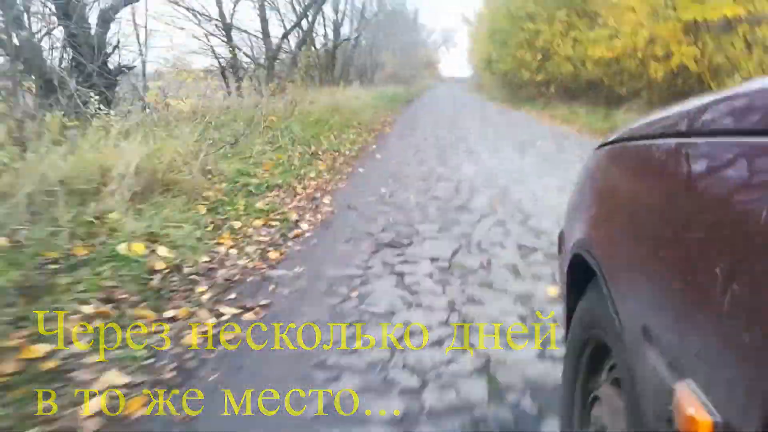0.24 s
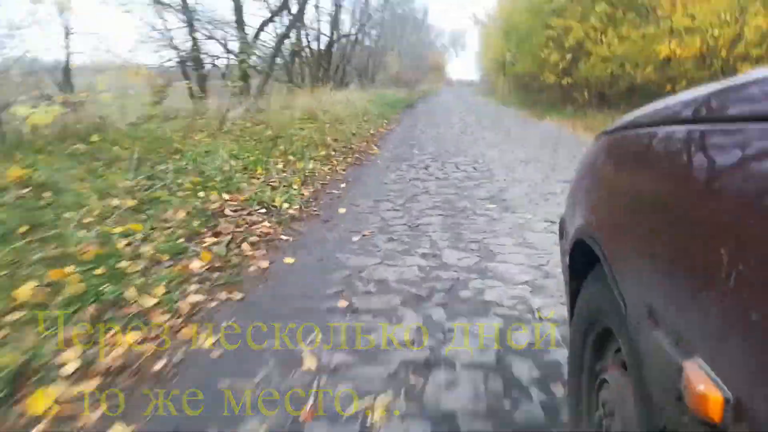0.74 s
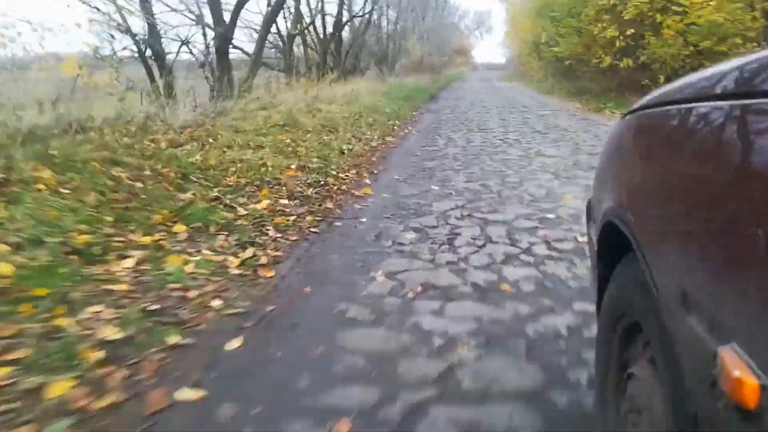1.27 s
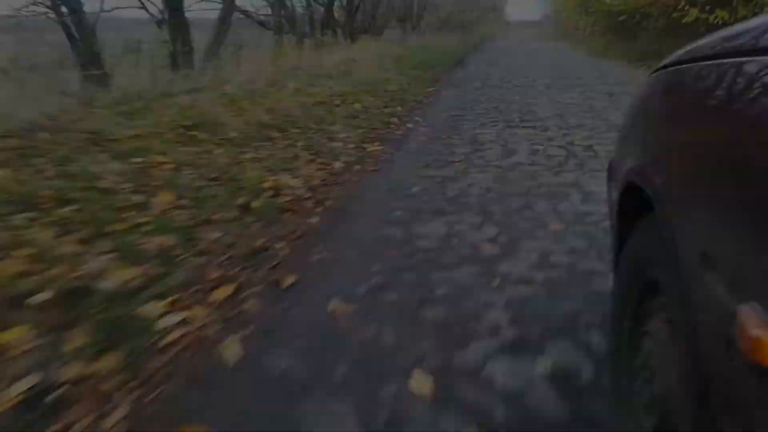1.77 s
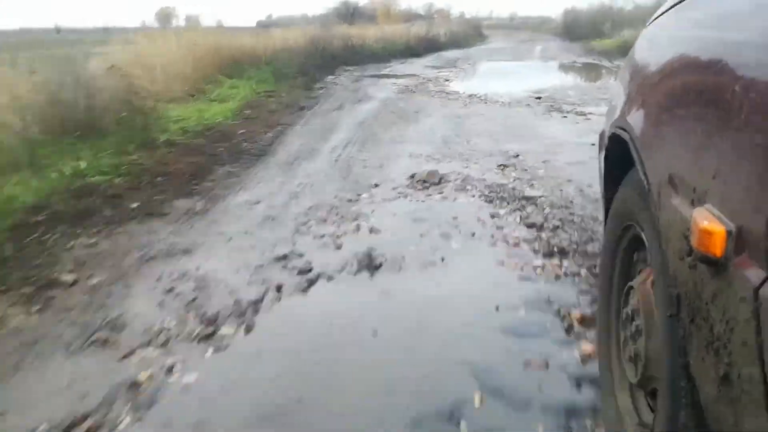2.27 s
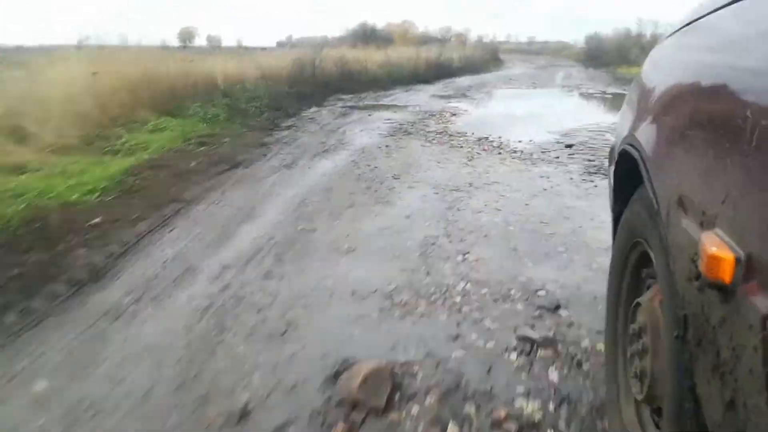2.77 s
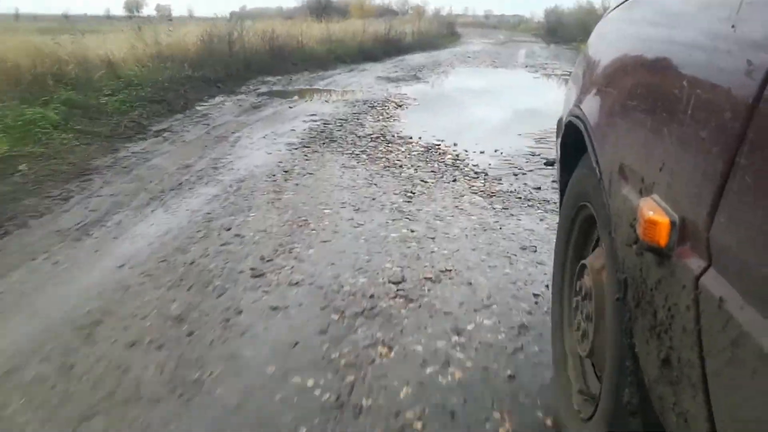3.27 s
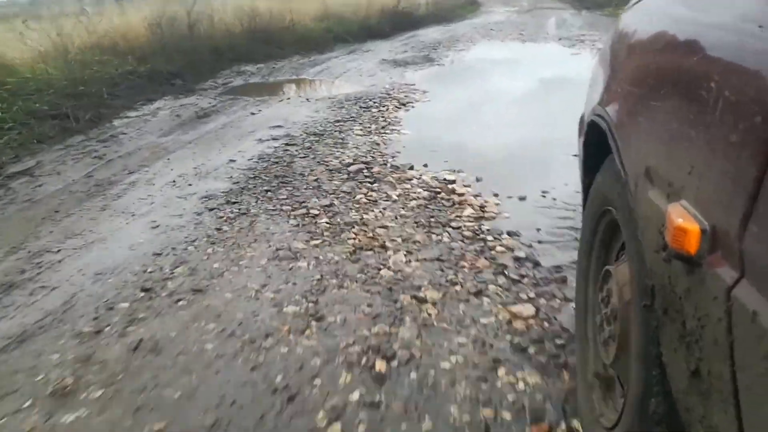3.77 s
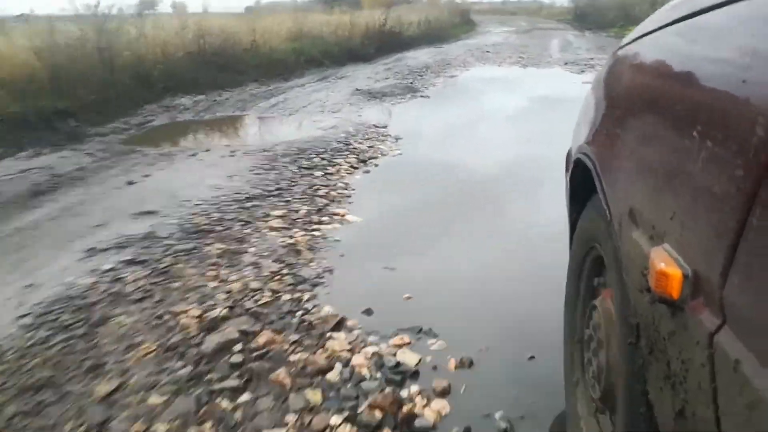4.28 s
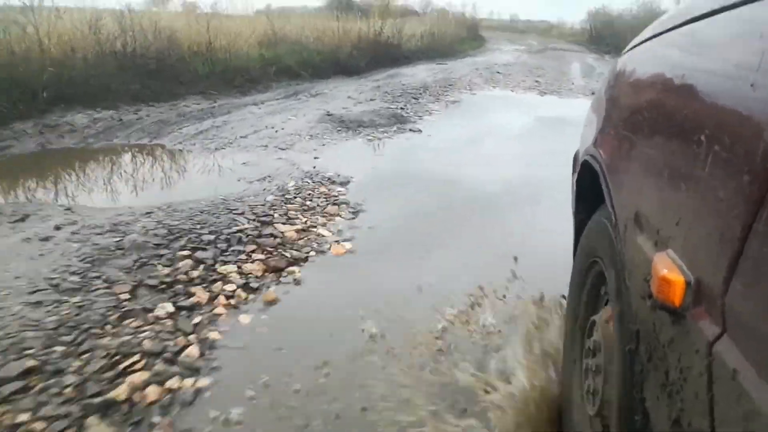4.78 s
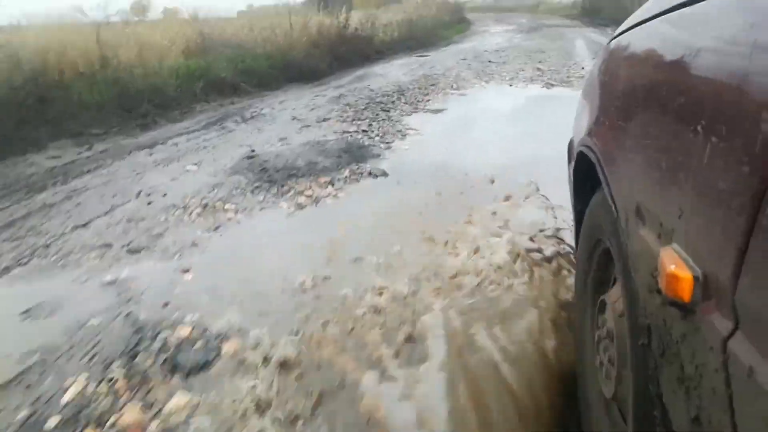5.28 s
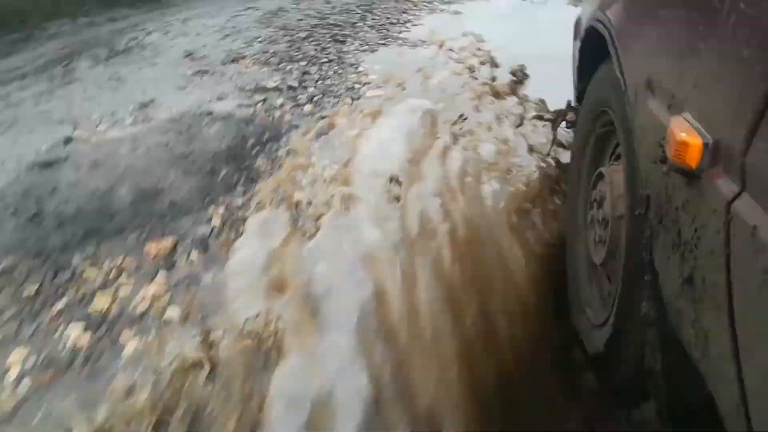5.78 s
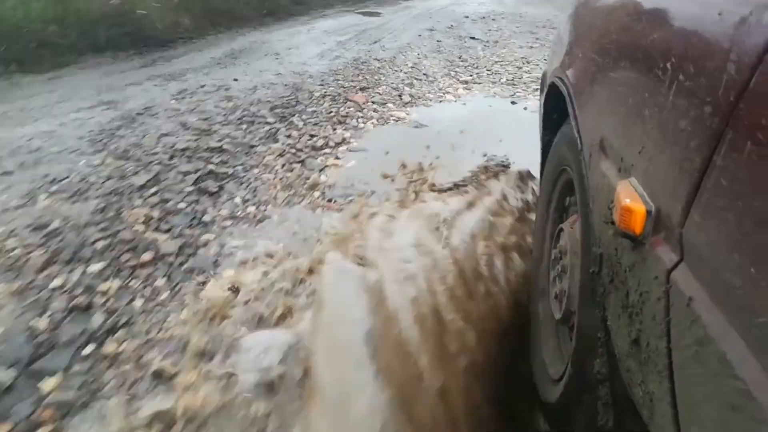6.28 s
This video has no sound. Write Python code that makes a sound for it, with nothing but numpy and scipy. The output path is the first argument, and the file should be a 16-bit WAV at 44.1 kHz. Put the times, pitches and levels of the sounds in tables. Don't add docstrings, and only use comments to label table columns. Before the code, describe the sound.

From 0 to 2 seconds, a small car rolls over cobbles, heard outdoors right beside its front wheel. A low exhaust hum pulses steadily under deep body rumble, soft tyre thumps and irregular hollow knocks, with light ticks and a tiny squeak near 0.4. Between 1.9 and 2.3 it cross-fades to a quieter wet track. The hum begins higher and sinks until about 3.3, while wind thumps the microphone, strongest around 2.7 to 3.3. Tyre hiss is faint, with a few stray stone clicks. Near 3.9 small splashes and wet gravel crunch, and the engine rises slightly. From 4.5 the wheel enters the puddle: spray swells into a bright, dense hiss with ringing droplets, stone cracks and hollow slaps, sharp at 4.75 and 5.3. The engine eases as loud spray continues; very hard slaps land at 5.9 and 6.25, with wind bursts, ending still in water about 6.5.

```python
import sys
import numpy as np
from scipy import signal
from scipy.fft import rfft, irfft, next_fast_len
from scipy.io import wavfile
from scipy.ndimage import uniform_filter1d

SR = 44100
rng = np.random.default_rng(int(sys.argv[2]) if len(sys.argv) > 2 else 0)


def dump(signal):
    limited = np.clip(np.atleast_2d(signal).T, -1, 1)
    pcm = np.round(limited * 32767).astype(np.int16)
    wavfile.write(sys.argv[1], SR, pcm)


def volts_from_decibels(level):
    exponent = np.asarray(level, float) / 20
    return 10 ** exponent


N = 287973
PADDED = next_fast_len(N)
HZ = np.maximum(np.arange(PADDED // 2 + 1) * SR / PADDED, 1)
CROSS_FADE_S = 1.94, 2.324

# t/s, four-stroke cycles per second f/Hz, fourth multiple level/dB
ENGINE_COBBLES = [
    (0, 16.9, -22),
    (.35, 17.1, -22.5),
    (.78, 16.9, -24),
    (1.0, 16.9, -25),
    (1.2, 16.7, -21),
    (1.33, 16.7, -20),
    (1.42, 16.7, -26),
    (1.78, 17, -20.5),
    (2.0, 16.8, -24),
    (2.2, 16.5, -32),
]
ENGINE_MUD = [(2.1, 23, -27), (2.2, 22.5, -18.5), (2.57, 20.4, -19), (2.75, 19, -22), (3.01, 17, -23),
              (3.26, 16.6, -25), (3.4, 16.9, -24), (3.99, 17.9, -23.5), (4.27, 18.7, -19.5),
              (4.65, 19.3, -18), (4.85, 19, -20), (5.05, 18.2, -24), (5.32, 16.8, -26), (5.5, 16.6, -25),
              (5.75, 16.7, -30), (5.9, 16.7, -26), (6.3, 16.7, -28), (6.45, 16.8, -21)]
# multiple, level/dB
WEAK_MULTIPLES = [(2, -27), (3, -58.5), (5, -49), (7, -32), (8, -32), (10, -43.5), (12, -54.5)]
# f/Hz, level/dB
SILENCER = [(30, -43), (100, -5.5), (132, 1), (150, -9), (260, 3)]
SIXTH_COBBLES_DB, SIXTH_MUD_DB, SIXTH_FOLLOWS_LOAD = -28.5, -28, 0.52

# t/s, hold/s, bounce level/dB
BUMPS = [(0.14, 0.077, -17), (.33, .03, -18.5), (.55, 0.095, -20.5), (.87, 0.052, -21), (1.16, .04, -16.5),
         (1.31, 0.017, -19.5), (1.56, 0.022, -21), (1.82, 0.035, -17.5), (1.94, 0.041, -14),
         (2.2, 0.09, -22.5), (2.71, 0.017, -29), (2.93, 0.2, -24.5), (4.4, 0.25, -22), (4.9, 0.039, -29),
         (5.5, 0.11, -24), (5.9, 0.11, -25.5), (6.4, 0.033, -24)]
# f/Hz, level per Hz/dB
RUMBLE_COLOUR = [(25, -22), (50, 2.5), (90, 6.5), (150, -0.5), (250, -5), (400, -10.5), (650, -19.5),
                 (900, -70.5)]
# t/s, hold/s, level/dB
GUSTS = [(0.0, 2.17, -16.5), (2.2, 0.11, -28), (2.38, 0.074, -26), (2.7, .07, -20.5), (2.8, 0.052, -26.5),
         (2.95, .05, -28), (3.03, 0.27, -22), (3.26, 0.072, -19.5), (3.6, .01, -45), (3.83, 0.03, -31.5),
         (4.02, 0.12, -25.5), (4.96, 0.0071, -24), (5.04, 0.099, -33), (5.24, 0.0079, -25.5),
         (5.31, 0.0033, -27), (5.49, 0.0037, -24), (6.14, .01, -34), (6.25, 0.014, -22), (6.38, 0.17, -21)]
# f/Hz, level per Hz/dB
WIND_COLOUR = [(30, -28), (70, -2.5), (140, 3), (300, -3), (450, -9.5), (650, -17), (900, -48.5),
               (1300, -69)]
# t/s, peak level/dB, f/Hz
EDDY_POPS = [(2.112, -22, 189.8), (2.258, -24, 173), (2.655, -15, 190), (2.689, -14, 316), (2.738, -7, 233),
             (2.941, -23, 180), (3.009, -14.5, 168), (3.053, -23, 202), (3.105, -11.5, 244),
             (3.137, -15, 300), (3.28, -16, 215), (3.312, -20, 219), (3.597, -25, 175), (3.98, -23, 170),
             (4.098, -22, 174), (4.323, -22.5, 178), (4.955, -39, 229), (5.234, -18, 180),
             (5.296, -15.5, 193), (5.476, -10, 333), (5.827, -35, 169), (5.881, -21, 244),
             (6.245, -14, 425), (6.343, -16, 173.8), (6.382, -16, 286), (6.446, -9, 186)]

# t/s, depth from 0 to 1
DEPTH = [(2.3, 0.18), (3.04, 0.15), (3.8, 0.36), (4.18, 0.29), (4.47, 0.55), (4.76, 0.72), (4.84, 0.85),
         (5.09, 1), (5.3, 0.99), (5.45, 0.93), (5.85, 0.95), (6.2, 0.96), (6.37, 0.96), (6.53, 0.96)]
# t/s, hold/s, rise in level/dB
SPLASHES = [
    (1.66, 0.06, 4),
    (3.86, .02, 7),
    (4.02, 0.01, 11),
    (4.22, 0.0098, 7),
    (4.35, 0.06, 4.5),
    (4.49, 0.0047, 5),
    (4.745, 0.0021, 5),
]
ARCH_LEVELS = -38.5, -45.5, -33, 0.46, 2.34
SPRAY_LEVELS = -49, -51.5, -29.5, 0.87, 0.98
MIST_LEVELS = -66, -65.5, -42.5, 0.68, 1.5
# f/Hz, level per Hz/dB
ARCH_COLOUR = [(350, -10.5), (550, -5), (750, 2.5), (1000, 5), (1300, 5), (1550, -5), (2200, -9.5),
               (3200, -62)]
# f/Hz, level per Hz/dB
SPRAY_COLOUR = [(1200, -40), (1500, -8.5), (1750, -3.5), (2600, -4), (4500, -5.5), (6400, -13), (8500, -16),
                (10500, -22.5), (13000, -26), (16000, -28.5)]

# t/s, peak level/dB, f/Hz
COBBLE_KNOCKS = [(0.053, -19, 1330), (0.117, -24, 1110), (0.134, -26, 1030), (0.164, -24, 1080),
                 (0.199, -29, 1360), (0.225, -23, 872), (0.283, -21, 1290), (0.304, -19, 1150),
                 (0.331, -23, 840), (0.426, -24, 1170), (0.455, -23, 1200), (0.49, -23, 1310),
                 (0.512, -23, 1180), (0.529, -21, 1140), (0.64, -25, 1180), (0.655, -21, 1330),
                 (0.693, -25, 1100), (0.721, -27, 1060), (0.776, -27, 746), (0.811, -27, 1280),
                 (0.845, -26, 972), (0.902, -25, 789), (0.929, -24, 703), (0.973, -26, 1080),
                 (1.01, -22, 1100), (1.105, -24, 1000), (1.185, -26, 1270), (1.246, -26, 1260),
                 (1.273, -27, 1120), (1.309, -28, 713), (1.34, -23, 929), (1.372, -22, 1170),
                 (1.426, -25, 746), (1.453, -29, 813), (1.502, -24, 1220), (1.526, -25, 1080),
                 (1.581, -20, 929), (1.611, -17, 1010), (1.704, -19, 1080), (1.764, -24, 703),
                 (1.782, -20, 1240), (1.807, -22, 1250), (1.836, -22, 1050), (1.931, -20, 1230),
                 (1.991, -26, 969), (2.083, -25, 1130)]
# t/s, peak level/dB, f/Hz
SLAPS = [(4.347, -27, 991), (4.455, -28, 904), (4.503, -31, 1040), (4.52, -29, 1000), (4.552, -26, 1180),
         (4.643, -17, 1130), (4.684, -20, 1050), (4.709, -16, 1010), (4.744, -10, 1320), (4.786, -24, 1060),
         (4.805, -20, 880), (4.818, -19, 1030), (4.855, -26, 1380), (4.868, -24, 1280), (4.905, -23, 1030),
         (4.942, -23, 939), (4.999, -18, 1050), (5.021, -21, 939), (5.056, -24, 1290), (5.09, -22, 1330),
         (5.153, -17, 1100), (5.199, -15, 1270), (5.299, -12, 991), (5.361, -22, 902), (5.391, -16, 1120),
         (5.425, -23, 786), (5.453, -20, 789), (5.487, -20, 842), (5.619, -25, 1150), (5.637, -22, 1130),
         (5.663, -22, 1150), (5.694, -23, 1070), (5.764, -26, 1250), (5.788, -23, 1100), (5.834, -21, 1370),
         (5.897, -9, 810), (5.935, -21, 1120), (5.974, -26, 910), (5.989, -22, 867), (6.03, -22, 1010),
         (6.064, -24, 902), (6.214, -16, 805), (6.247, -7, 813), (6.319, -26, 980), (6.343, -25, 842),
         (6.37, -26, 1280), (6.39, -21, 1100), (6.444, -24, 1210), (6.47, -19, 1010), (6.512, -23, 1110)]
# t/s, peak level/dB, f/Hz
STRAYS = [(2.27, -29, 900), (2.563, -26, 1100), (2.947, -20, 1040), (3.07, -27, 1340), (3.201, -26, 750),
          (3.203, -29, 1300), (4.02, -26, 700), (4.39, -26, 600), (4.643, -19, 850), (4.722, -16, 880),
          (4.746, -12, 1200), (4.812, -20, 1000), (5.317, -20, 800), (5.375, -21, 800), (5.462, -20, 690),
          (5.487, -19, 600), (5.899, -12, 650), (6.234, -19, 470), (6.2485, -7, 1100), (6.249, -10, 500)]
# t/s, peak level/dB, f/Hz
THUMPS = [(0.054, -19, 264), (0.121, -22, 261), (0.212, -32, 205.5), (0.339, -25, 188), (0.398, -25, 188),
          (0.489, -18, 288), (0.519, -16, 216), (0.566, -18, 211), (0.772, -15.5, 310), (0.927, -30, 191),
          (0.968, -31, 191), (1.081, -19, 208), (1.194, -16.5, 206), (1.233, -20.5, 290),
          (1.284, -17.5, 223), (1.369, -21, 253), (1.395, -16, 217), (1.579, -24, 186), (1.638, -25, 237),
          (1.785, -21, 291), (1.882, -23, 233), (1.982, -23, 199)]
# t/s, peak level/dB, f/Hz
TICKS = [(0.0528, -26, 1870), (0.0852, -30, 1850), (0.1166, -31, 1800), (0.2867, -31, 1770),
         (0.3795, -31, 2060), (0.5097, -30, 2020), (0.6549, -31, 1810), (0.6719, -32, 1910),
         (0.6953, -33, 1820), (1.1039, -27, 1750), (1.1832, -29, 1780), (1.2331, -32, 1870),
         (1.2456, -27, 1840), (1.3094, -32, 1970), (1.3723, -30, 1950), (1.4491, -30, 1900),
         (1.5798, -32, 1770), (1.7818, -24, 2590), (1.8367, -32, 1890), (1.8577, -30, 1750),
         (1.922, -22, 3470), (2.0068, -28, 3080), (2.2603, -34, 1750), (2.3775, -35, 2210),
         (2.5631, -36, 1750), (2.5631, -29, 2320), (2.8973, -34, 2190), (2.9477, -24, 3030),
         (3.0709, -33, 3040), (3.5264, -34, 2480), (3.9858, -28, 2920), (4.0682, -27, 2960),
         (4.2004, -28, 1820), (4.2168, -28, 4010)]
# t/s, peak level/dB, f/Hz
WET_TICKS = [(4.4904, -22, 1750), (4.4914, -15, 2020), (4.5123, -21, 3640), (4.5727, -25, 1860),
             (4.5897, -25, 2820), (4.6026, -19, 3620), (4.6431, -21, 2060), (4.7094, -21, 2180),
             (4.7438, -15, 1910), (4.8032, -18, 1900), (4.868, -15, 2440), (4.868, -12, 2280),
             (4.9074, -19, 2000), (4.9374, -17, 1800), (5.0471, -22, 2290), (5.0601, -14, 2300),
             (5.0915, -18, 3630), (5.1953, -16, 2120), (5.31, -16, 1840), (5.4931, -19, 3050),
             (5.5335, -19, 1820), (5.6388, -19, 3800), (5.7121, -22, 1960), (6.002, -21, 2170),
             (6.218, -18, 2630), (6.5108, -17, 2000)]
# t/s, peak level/dB, f/Hz
CRACKS = [(1.923, -25, 3900), (2.9485, -28, 2000), (3.873, -26, 1940), (4.217, -19, 4350),
          (4.492, -21, 3300), (4.604, -22, 2000), (4.661, -22, 1700), (4.711, -26, 4000),
          (4.745, -22, 2800), (4.869, -16, 3600), (4.870, -17, 4400), (4.938, -23, 3800),
          (5.199, -18, 6000)]
# t/s, peak level/dB, f/Hz
SPITS = [(1.922, -53, 6070), (1.9744, -51, 5980), (2.8958, -39, 7010), (3.8207, -30, 5080),
         (3.8641, -39, 5080), (3.8861, -35, 5090), (3.9135, -29, 5143), (3.9913, -38, 5100),
         (4.0228, -27, 5250), (4.0701, -34, 6890), (4.2158, -44, 5076), (4.4343, -26, 5600),
         (4.4912, -47, 5060), (4.5126, -52, 5170), (4.6114, -33, 5077), (4.6443, -32, 6510),
         (4.7431, -42, 5040), (4.8673, -34, 5021), (4.9372, -19.5, 4960), (4.994, -37, 5294),
         (5.0544, -26, 4980), (5.1991, -15, 5800), (5.255, -21, 5300), (5.3268, -20, 5010),
         (5.3782, -19.5, 5430), (5.45, -32, 5776)]

# t/s, hold/s, level/dB
SQUEAK = [
    (.352, .008, -43),
    (.385, .015, -47),
    (.42, .012, -46),
]
# t/s, hold/s, level/dB
CRUNCH = [
    (3.84, .3, -43.5),
    (4.26, .01, -48),
    (4.34, .14, -47.5),
]
# f/Hz, width f/Hz, level/dB
GRAVEL_BANDS = [(3150, 600, 2), (4900, 500, -1), (6800, 700, -9), (7900, 700, -14)]
# t/s, hold/s, level/dB
SLOSH = [
    (4.7, 0.02, -29),
    (4.81, 0.01, -30),
    (5.3, .1, -32),
    (5.47, .03, -31),
    (5.91, 0.04, -29),
    (6.222, 0.03, -27),
]
# f/Hz, level per Hz/dB
HOLLOW_COLOUR = [(300, -28), (500, -22), (720, -9), (950, 4.5), (1250, 4), (1500, -20), (2200, -45.5)]
# f/Hz, left-right likeness, left over right level/dB
PORTS = [(50, 0.97, 0.8), (130, 0.9, 1), (250, 0.94, 2.5), (620, 0.37, 3), (900, 0.81, 3.5), (1800, 1, 2.5),
         (2060, 0.11, 6), (4740, 0.16, 7.5), (8500, 0.035, 4), (15000, 0.045, 0)]


def rms_one(x):
    return x / np.sqrt(np.mean(x ** 2) + 1e-20)


def in_time(rows):
    s, *columns = np.transpose(rows)
    return [np.interp(np.arange(N) / SR, s, column) for column in columns]


def at_hz(points, hz, order=1):
    points = np.array(points)
    return np.interp(np.log(hz), np.log(points[:, 0]), points[:, order])


def by_road(cobbles, mud):
    return np.interp(np.arange(N) / SR, CROSS_FADE_S, [cobbles, mud])


def swells(rows, rest_db, rise_db_per_s, fall_db_per_s):
    t = np.arange(0, N + 40, 40) / SR
    s, hold, db = np.transpose(rows)[..., None]
    climb = rise_db_per_s * np.maximum(s - t, 0)
    sink = fall_db_per_s * np.maximum(t - s - hold, 0)
    top = (db - climb - sink).max(axis=0)
    return np.maximum(rest_db, np.interp(np.arange(N) / SR, t, top))


def drift(rate_hz):
    r = np.exp(-80 * np.pi * rate_hz / SR)
    noise = rng.standard_normal(N // 40 + 2002)
    slow = signal.lfilter([1], [1, -2 * r, r * r], noise)[2000:]
    return np.interp(np.arange(N) / 40, np.arange(len(slow)), rms_one(slow))


def resonance(x, hz, width_hz):
    r = np.exp(-np.pi * width_hz / SR)
    feedback = [1, -2 * r * np.cos(2 * np.pi * hz / SR), r * r]
    return signal.lfilter([(1 - r * r) / 2, 0, (r * r - 1) / 2], feedback, x)


def colour(x, spectrum):
    shaped = rfft(x, PADDED) * volts_from_decibels(at_hz(spectrum, HZ))
    return rms_one(irfft(shaped, PADDED)[..., :N])


def grains(per_s, spread_db, last_s):
    sizes = volts_from_decibels(spread_db * np.minimum(rng.exponential(1, N), 4))
    sizes = sizes * (rng.random(N) < per_s / SR)
    fade = signal.lfilter([1], [1, -np.exp(-1 / (last_s * SR))], sizes + 1e-18)
    return rms_one(fade * rng.standard_normal((2, N)))


def hits(rows, cycles, puff_s, bite, trim_db):
    out, t = np.zeros((2, N + 2000)), np.arange(2000) / SR
    for s, peak_db, hz in rows:
        push = rng.standard_normal((2, 2000)) * np.exp(-t / puff_s) * 0.22
        push[:, 0] -= 1.5
        rung = resonance(push, hz, hz / cycles)
        rung = resonance(resonance(rung, hz, bite * hz), hz, 2 * hz)
        rung = rung / np.abs(rung).max(axis=1, keepdims=True)
        at = round(s * SR)
        out[:, at:at + 2000] += volts_from_decibels(peak_db + trim_db) * rung
    return out[:, :N]


def engine(rows, sixth_db, fade):
    cycles, fourth_db = in_time(rows)
    sixth_db = sixth_db + SIXTH_FOLLOWS_LOAD * (fourth_db + 23)
    turn = 2 * np.pi * np.cumsum(cycles) / SR
    out = volts_from_decibels(fourth_db + 1.2 * drift(20)) * np.cos(4 * turn)
    out = out + volts_from_decibels(sixth_db + 1.6 * drift(20)) * np.cos(6 * turn)
    for multiple, level_db in WEAK_MULTIPLES:
        level_db = level_db + at_hz(SILENCER, multiple * cycles) + 2.1 * drift(1.2)
        out = out + volts_from_decibels(level_db) * np.cos(multiple * turn + 0.3 * drift(4))
    return -np.sqrt(2) * out * fade


def gusts():
    return swells(GUSTS, rest_db=-40.5, rise_db_per_s=228, fall_db_per_s=303) + by_road(-15.0, 0)


def wind():
    eddy_lag_s, alike = 0.00086, 0.9
    eddies = colour(grains(300, 3.0, 0.003), WIND_COLOUR)
    swing = np.sqrt(uniform_filter1d(eddies ** 2, size=1800) + 0.071)
    eddies = rms_one(eddies / swing)
    pops = hits(EDDY_POPS, cycles=2.55, puff_s=0.0069, bite=1.0, trim_db=-2.5)
    first, second = volts_from_decibels(gusts() - 3.5) * eddies + pops
    late = np.interp(np.arange(N) - eddy_lag_s * SR, np.arange(N), first)
    left = alike * late + np.sqrt(1 - alike ** 2) * second
    pair = np.array([volts_from_decibels(-1.0) * left, volts_from_decibels(3.0) * first])
    return signal.sosfilt(signal.butter(2, [70, 620], "band", fs=SR, output="sos"), pair)


def body():
    bounce_hz, width_hz = 32.3, 7
    between_bumps_db = by_road(-24, -32.5)
    bounce_db = swells(BUMPS, between_bumps_db, rise_db_per_s=112, fall_db_per_s=86)
    road_db = by_road(-31.5, -42.5) + 9 * in_time(DEPTH)[0]
    rumble_db = np.maximum(road_db, gusts() - 10.5)
    bounce = resonance(rng.standard_normal((2, N)), bounce_hz, width_hz)
    bounce = resonance(bounce, bounce_hz, 32)
    swing = np.sqrt(uniform_filter1d(bounce ** 2, size=3000)) / np.std(bounce)
    bounce = rms_one(bounce / (swing + 0.16))
    rumble = colour(grains(600, 0.96, 0.004), RUMBLE_COLOUR)
    return volts_from_decibels(bounce_db + 0.5) * bounce + volts_from_decibels(rumble_db + 5.0) * rumble


def tyre_levels():
    depth = np.maximum(in_time(DEPTH)[0], 0)
    splash_db = swells(SPLASHES, rest_db=0, rise_db_per_s=195, fall_db_per_s=147)
    levels = []
    for cobbles, mud, deep, share, power in (ARCH_LEVELS, SPRAY_LEVELS, MIST_LEVELS):
        levels.append(by_road(cobbles, mud) + (deep - mud) * depth ** power + share * splash_db)
    return levels


def tyre():
    arch_db, spray_db, mist_db = tyre_levels()
    stony = by_road(0.5, 0.25)
    rough = np.sqrt(stony) * grains(300, 1.9, 0.0018)
    rough = rough + np.sqrt(1 - stony) * rng.standard_normal((2, N))
    out = volts_from_decibels(arch_db + 1.5 + 1.34 * drift(34)) * colour(rough, ARCH_COLOUR)
    hiss = 0.44 * rough + 1.8 * rng.standard_normal((2, N))
    spray = np.sqrt(0.5) * grains(600, 3.8, 0.0018) + np.sqrt(0.5) * hiss
    spectrum = rfft(colour(spray, SPRAY_COLOUR), PADDED)
    step = np.clip(np.log2(HZ / 1400) * 2, 0, 7)
    together = 1.1 * drift(22.5)
    for k in range(8):
        band = irfft(spectrum * np.clip(1 - np.abs(step - k), 0, 1), PADDED)[:, :N]
        top = np.clip((k - 2.2) / 0.95, 0, 1)
        band_db = (1 - top) * spray_db + top * (mist_db + 12.5)
        out += volts_from_decibels(band_db + together + 1.28 * drift(19) + 0.77) * band
    return out + droplets(spray_db)


def droplets(spray_db):
    wet = np.interp(np.arange(N) / SR, [4.3, 4.8], [0.1, 1])
    sizes = volts_from_decibels(3.6 * np.minimum(rng.exponential(1, N), 4))
    sizes = sizes * (rng.random(N) < 500 * volts_from_decibels(3.0 * drift(8)) / SR)
    dealt, signs = rng.integers(0, 14, N), rng.choice([-1, 1], (2, N))
    rings = np.zeros((2, N))
    for k, hz in enumerate(np.geomspace(1700, 9000, 14)):
        drops = sizes * signs * (dealt == k) + 1e-18
        rings += resonance(drops, hz, hz / 37.0) * (2000 / hz) ** 1.75
    return wet * volts_from_decibels(spray_db - 5.5) * rms_one(rings)


def knocks():
    dry_knocks = hits(COBBLE_KNOCKS, cycles=5.0, puff_s=0.003, bite=0.9, trim_db=1.2)
    return dry_knocks + hits(SLAPS + STRAYS, cycles=5.5, puff_s=0.0025, bite=0.85, trim_db=-0.3)


def ticks():
    return hits(TICKS + WET_TICKS + CRACKS, cycles=4.5, puff_s=0.0025, bite=0.9, trim_db=1.5)


def thumps():
    return hits(THUMPS, cycles=4.1, puff_s=0.0099, bite=1.6, trim_db=-6.0)


def squeak():
    rub = rms_one(resonance(grains(900, 2.1, 0.002), 4230, 450)) * volts_from_decibels(-1.0)
    return volts_from_decibels(swells(SQUEAK, rest_db=-85.5, rise_db_per_s=1500, fall_db_per_s=250)) * rub


def spits():
    return hits(SPITS, cycles=2.5, puff_s=0.0015, bite=1.3, trim_db=1.5)


def crunch():
    crushed = grains(900, 2.5, 0.001)
    stones = np.zeros((2, N))
    for hz, width_hz, db in GRAVEL_BANDS:
        ring = resonance(resonance(crushed, hz, width_hz), hz, 2 * width_hz)
        stones += volts_from_decibels(db) * rms_one(ring)
    return volts_from_decibels(swells(CRUNCH, rest_db=-88, rise_db_per_s=500, fall_db_per_s=200)) * rms_one(stones)


def slosh():
    water = colour(grains(900, 2.0, 0.0015), HOLLOW_COLOUR)
    return volts_from_decibels(swells(SLOSH, rest_db=-58.5, rise_db_per_s=900, fall_db_per_s=1100)) * water


def ports(pair):
    left_lag_s = 0.000094
    alike = np.clip(at_hz(PORTS, HZ), 0, 1)
    tilt = volts_from_decibels(at_hz(PORTS, HZ, order=2) / 2)
    near, other = rfft(pair, PADDED)
    left = near * tilt * np.exp(-2j * np.pi * HZ * left_lag_s)
    right = (alike * near + np.sqrt(1 - alike ** 2) * other) / tilt
    return irfft([left, right], PADDED)[:, :N]


def scene():
    fade = np.interp(np.arange(N) / SR, CROSS_FADE_S, [0, 1])
    hum = engine(ENGINE_COBBLES, SIXTH_COBBLES_DB, np.sqrt(1 - fade))
    hum = hum + engine(ENGINE_MUD, SIXTH_MUD_DB, np.sqrt(fade))
    wheel = body() + tyre() + knocks() + ticks() + thumps()
    wheel += squeak() + spits() + crunch() + slosh()
    return hum * volts_from_decibels([[0.1], [-0.1]]) + ports(wheel) + wind()


def limit(x):
    limit_db, depth, attack_s, release_db_per_s = -6, 1.05, 0.006, 65
    climb = release_db_per_s * np.arange(N) / SR
    over = np.maximum(20 * np.log10(np.abs(x).max(axis=0) + 1e-9) - limit_db, 0)
    held = np.maximum.accumulate(depth * over + climb) - climb
    r = np.exp(-1 / (attack_s * SR))
    return x * volts_from_decibels(-signal.lfilter([1 - r], [1, -r], held))


def band_limit(x):
    return signal.sosfilt(signal.butter(12, 15690, fs=SR, output="sos"), x)


def record(dry):
    mix = signal.sosfilt(signal.butter(2, 14, "high", fs=SR, output="sos"), dry)
    mix = limit(mix) * np.minimum(np.arange(N) / SR / 0.004, 1)
    mix = signal.sosfilt(signal.ellip(12, 0.5, 50, 15720, fs=SR, output="sos"), mix)
    return band_limit(mix)


dry = scene()
out = record(dry)
dump(out)
```